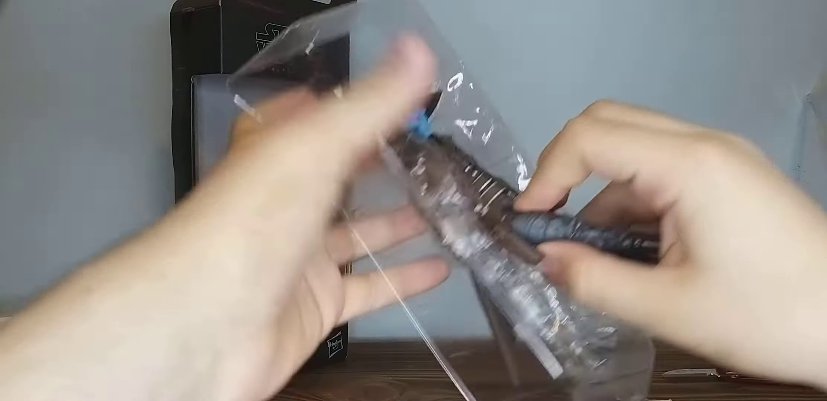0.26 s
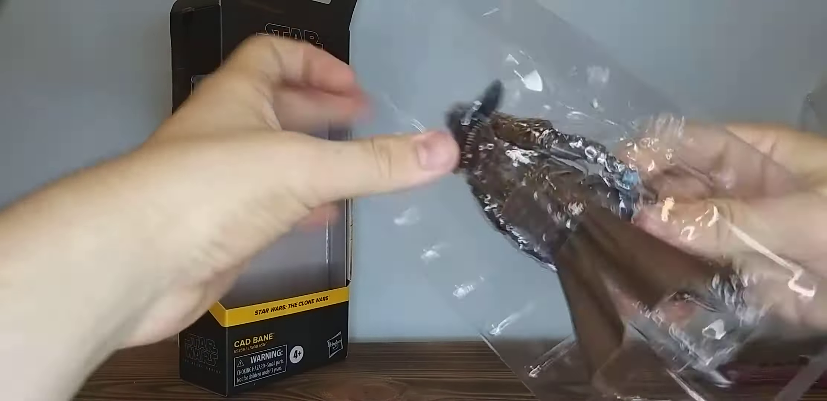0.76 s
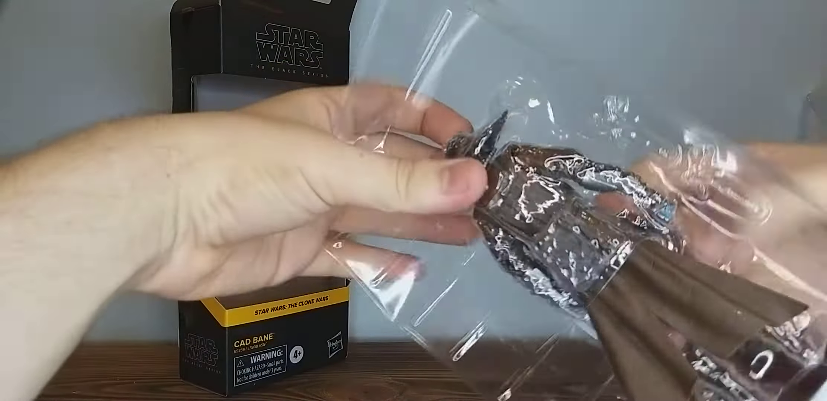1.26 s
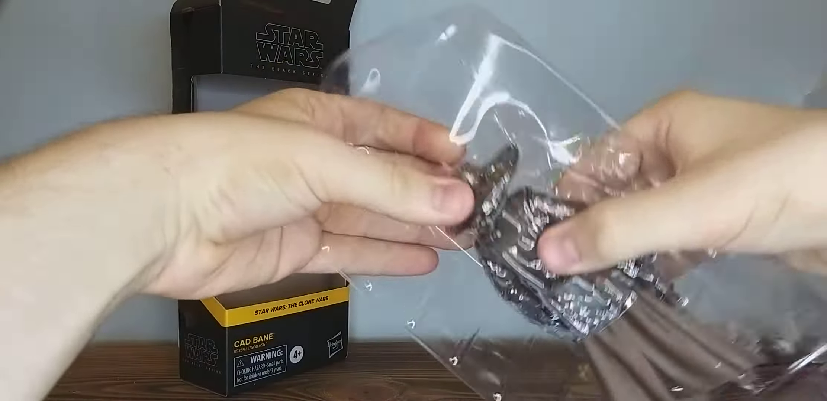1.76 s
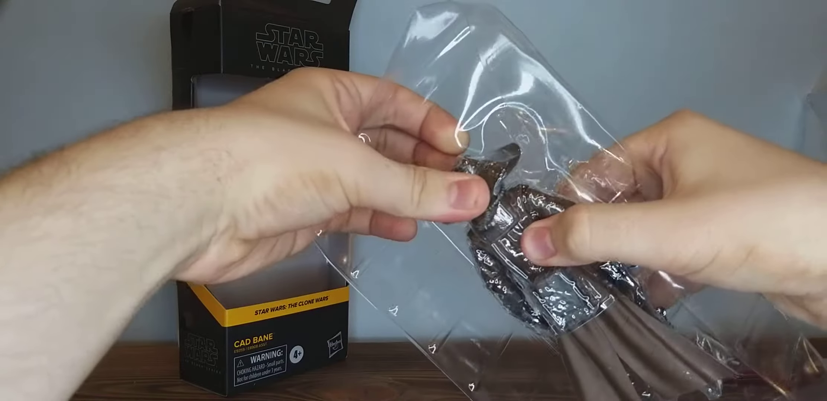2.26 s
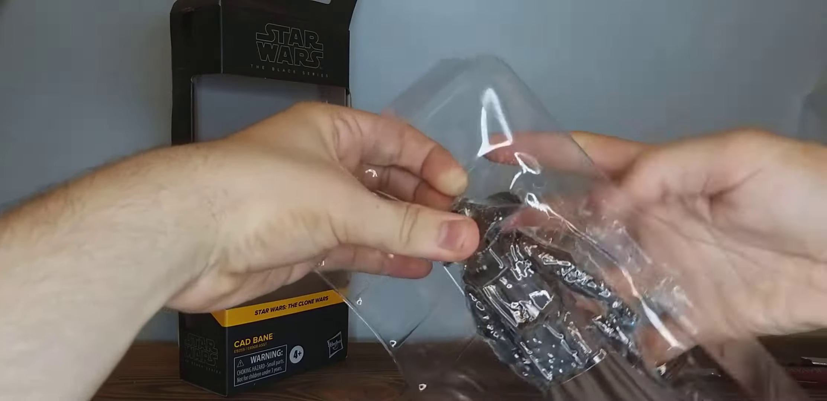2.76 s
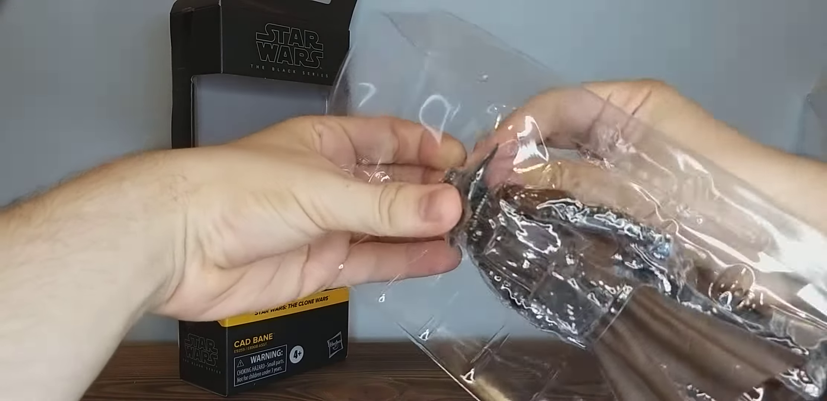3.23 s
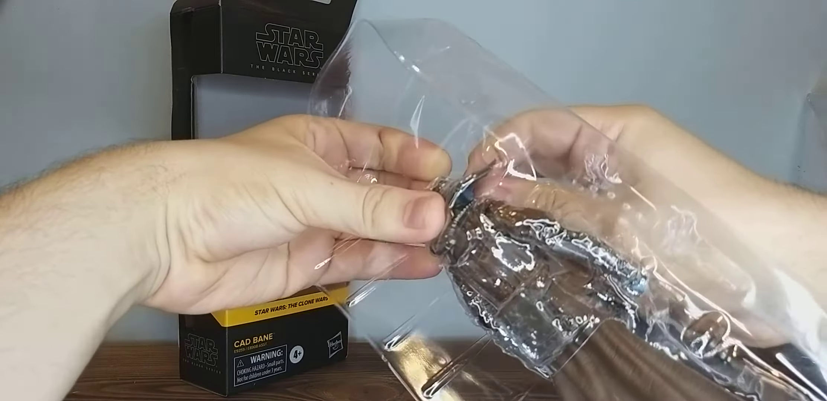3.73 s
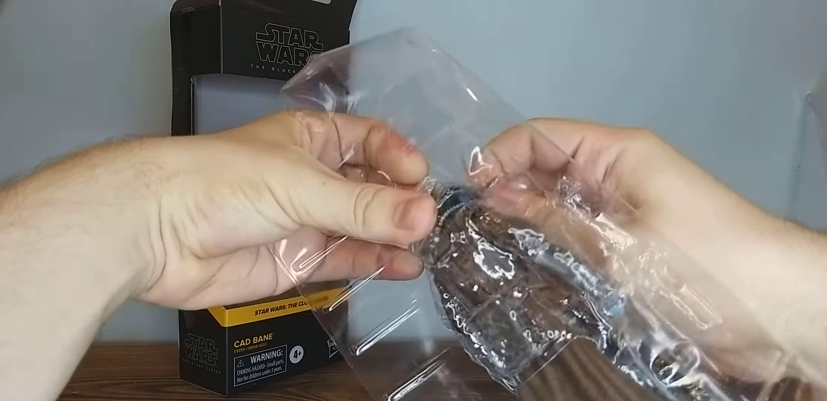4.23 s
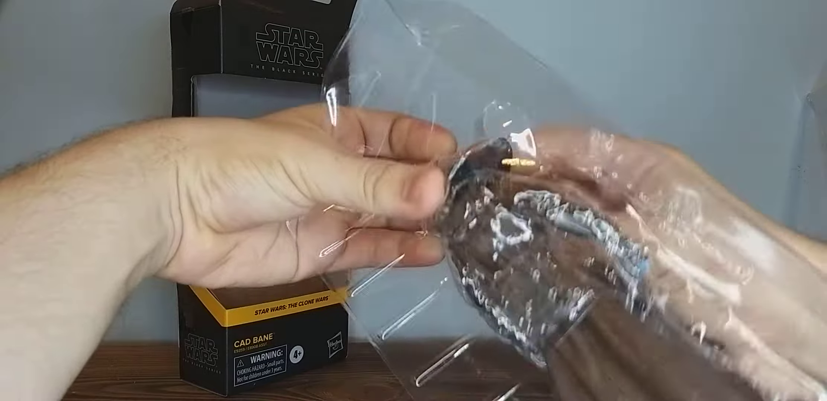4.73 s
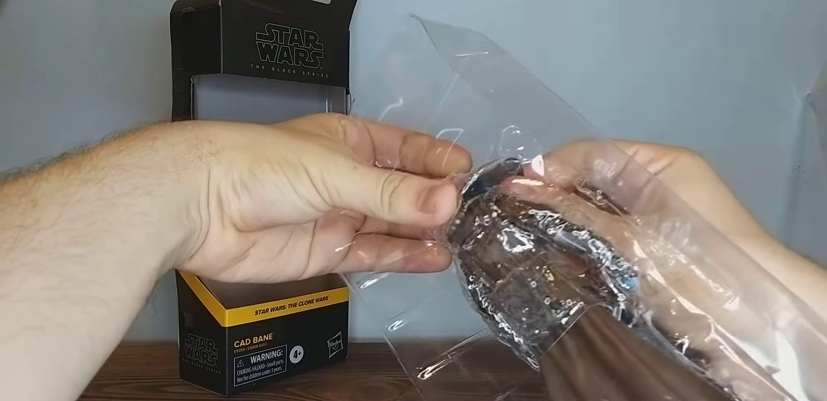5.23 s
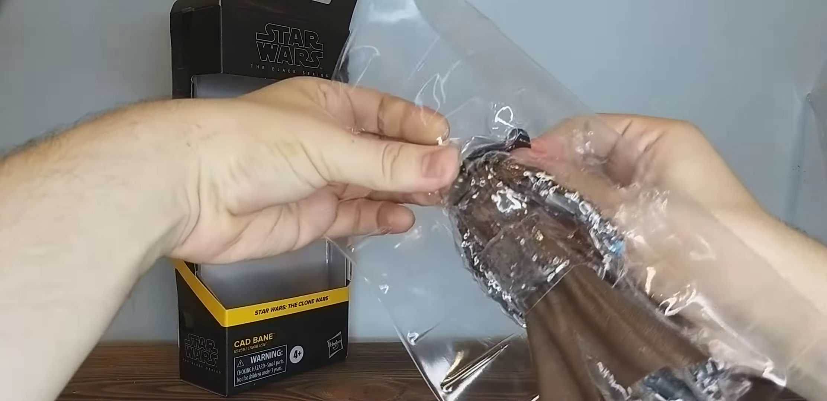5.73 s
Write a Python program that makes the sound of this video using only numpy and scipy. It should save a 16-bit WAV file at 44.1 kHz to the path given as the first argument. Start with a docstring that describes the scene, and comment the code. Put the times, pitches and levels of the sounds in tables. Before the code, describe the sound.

Close to a stereo microphone, hands squeeze and flex thin plastic packaging, which crackles in uneven bursts from start to finish. Single creases give way with crisp clicks, wider panels flip with dull pops, and edges tick as they slip. Each squeeze brings a quick swell of crinkling and low rustle, with short lulls between. The small room adds a short tail and a very faint hiss.

```python
"""A thin moulded plastic tray, bent in two hands close to a stereo camera microphone in a small quiet room.
Creases snap one by one: each clicks at its own pitch, rings the tray and fizzes in the treble.
Wide panels flip with dull pops, edges slip past pocket walls and fingertips tick on the plastic.
A carpet of small crackles and the low rustle of the flexing sheet follow the grip.
Behind them lie a short room tail and a faint hiss."""
import sys
import numpy as np
from scipy import signal
from scipy.fft import rfft, irfft
from scipy.io import wavfile
from scipy.ndimage import uniform_filter1d

SR = 44100
rng = np.random.default_rng(int(sys.argv[2]) if len(sys.argv) > 2 else 0)


def int16_out(signal):
    """Quantize to a 16-bit WAV file."""
    q = np.round(np.clip(np.atleast_2d(signal).T, -1, 1) * 32767)
    wavfile.write(sys.argv[1], SR, q.astype(np.int16))


N = 264447
EVENT_SAMPLES = 1024
HZ = np.fft.rfftfreq(EVENT_SAMPLES, 1 / SR)


def gain_of(db):
    return 10 ** (np.asarray(db) / 20)


def curve_at(points, hz):
    """Reads (frequency, value) points along a logarithmic frequency axis."""
    f, value = np.transpose(points)
    return np.interp(np.log(hz + 1), np.log(f + 1), value)


def resonance(hz, width):
    """Causal response of one resonance, gain 1 at its centre."""
    return 1j * HZ * width / (hz ** 2 - HZ ** 2 + 1j * HZ * width)


def stereo_pair(a, b, hz, lag_s=0):
    """Left and right spectra at the microphone from two unrelated ones, by likeness, balance and lag."""
    # how alike the two capsules hear: (frequency [Hz], likeness [0..1])
    likeness = [(60, 0.8), (380, 0.99), (1500, 0.3), (6000, 0.41)]
    # balance of the pair: (frequency [Hz], left minus right [dB])
    balance = [(60, 1), (400, -0.15), (950, 1.25), (3800, 1.5), (7500, 2), (15000, -0.5)]
    alike = np.clip(curve_at(likeness, hz), 0, 1)
    lean = gain_of(curve_at(balance, hz) / 2) * np.exp(1j * np.pi * hz * lag_s)
    common, apart = np.sqrt(1 + alike) * a, np.sqrt(1 - alike) * b
    return np.array([(common + apart) * lean, (common - apart) / lean])


def burst(parts, rise_s, t60_s, uneven_db, jolt):
    """A row per event: a jolt, then uneven slips faded out by 17 ms, through (dB over 5 ms, colour) parts."""
    t = np.arange(EVENT_SAMPLES * 3 // 4) / SR
    noise = rng.standard_normal((len(parts[0][0]), 3, len(t)))
    slips = gain_of(uneven_db * np.sqrt(12) * uniform_filter1d(noise[:, 2], size=12))
    envelope = slips * (1 - np.exp(-t / rise_s)) * gain_of(-60 * t / t60_s) * np.cos(np.pi / 2 * t / t[-1])
    jump = -jolt * np.exp(-((t - rise_s) / (0.18 * rise_s)) ** 2)  # the wall jumps the same way every time
    lag_s = .00006 * noise[:, 2, :1]  # each event sits at its own place on the tray
    drive = stereo_pair(rfft(noise[:, 0] * envelope + jump, EVENT_SAMPLES),
                        rfft(noise[:, 1] * envelope, EVENT_SAMPLES), HZ, lag_s)
    power = (abs(drive) ** 2).mean(0)
    response = 0
    for db, colour in parts:
        rms = np.sqrt(2 * (power * abs(colour) ** 2).sum(1) / EVENT_SAMPLES / (SR // 200))
        response = response + colour * (gain_of(db) / rms)[:, None]
    return irfft(drive * response)


def snap(crease_db, pitch_hz, ring_db, fizz_db, jolt=2.8):
    """The crease clicks at its own pitch, the tray rings under it, the film fizzes above."""
    # ring of the whole tray: (frequency [Hz], width [Hz], relative level [dB])
    tray_modes = [(445, 276, -3.5), (1039, 172, 4.5), (1670, 900, -6)]
    # moulded pockets that colour the creases: (frequency [Hz], width [Hz], relative level [dB])
    pocket_modes = [(2754, 200, -1), (3670, 160, -24.5)]
    pitch_hz = pitch_hz[:, None]
    tone = 1 + gain_of(5.5) * resonance(pitch_hz, .2 * pitch_hz)
    click_hz = 3170 * (pitch_hz / 3170) ** 0.56  # the wide click leans toward the crease's pitch
    pockets = 1 + sum(gain_of(db) * resonance(f, width) for f, width, db in pocket_modes)
    facet_hz = click_hz * 2 ** rng.uniform(-0.97, 1.0, (len(click_hz), 3))  # small flats beside the crease
    facets = 1 + 1.5 * sum(resonance(f[:, None], .13 * f[:, None]) for f in facet_hz.T)
    # the click rolls off above about 6.6 kHz, leaving the top to the fizz
    lowpass = 1 / (1 - (HZ / 6600) ** 2 + 1j * HZ / 6600) ** 2
    crease = resonance(click_hz, 3.85 * click_hz) ** 2 * tone * pockets * facets * lowpass
    modes = sum((-1) ** k * gain_of(db) * resonance(f, width) for k, (f, width, db) in enumerate(tray_modes))
    ring = modes * resonance(1275, 3500)
    fizz = resonance(12040, 12000) ** 3
    body = burst([(crease_db, crease), (ring_db, ring)], rise_s=0.00038, t60_s=0.021, uneven_db=4.5, jolt=jolt)
    return body + burst([(fizz_db, fizz)], rise_s=0.00012, t60_s=0.012, uneven_db=3, jolt=5)


def place(times, sounds):
    """Places each stereo event at its time in seconds."""
    track = np.zeros((2, N + EVENT_SAMPLES))
    for time, sound in zip(times, sounds.swapaxes(0, 1)):
        start = max(round(time * SR), 0)
        track[:, start:start + EVENT_SAMPLES] += sound
    return track[:, :N]


def grip(t):
    """Level and dullness (dB) of the grip: squeezes bite fast and let go slowly, over a faint dull unrest."""
    # squeezes of the fingers: (start [s], hold [s], level [dB], dullness [dB])
    squeezes = [(0, .035, -54, -4.5), (0.025, .05, -46.5, 5), (0.139, 0.041, -32, 2), (0.257, 0.13, -45, 5),
                (0.448, 0.061, -43.5, 7), (0.59, .03, -50, 1.5), (0.661, 0.21, -48.5, 7.5),
                (1.053, 0.029, -49, -2), (1.126, 0.26, -52.5, 5.5), (1.472, 0.12, -46.5, 2.5),
                (1.669, 0.061, -41, 2), (1.803, 0.14, -48.5, 3), (2.032, .2, -40.5, -3.5),
                (2.3, 0.04, -36, -7), (2.424, .18, -45.5, 1.5), (2.661, 0.11, -54, -5.5),
                (2.838, .2, -49.5, -2), (3.144, 0.027, -52.5, -6), (3.317, 0.019, -58.5, -7),
                (3.448, 0.048, -65.5, 12), (3.571, 0.3, -57.5, 0), (3.799, 0.039, -44, 2),
                (3.95, 0.16, -51.5, -0.5), (4.169, 0.042, -52.5, 0.5), (4.211, 0.036, -44.5, -1.5),
                (4.323, .17, -49.5, 4), (4.55, 0.17, -37.5, 0.5), (4.903, 0.13, -54.5, -0.5),
                (5.035, 0.24, -48.5, 2.5), (5.346, 0.16, -58.5, -3.5), (5.453, 0.13, -41.5, 1),
                (5.587, 0.072, -42.5, 3), (5.758, 0.22, -52, 1.5)]
    bite_s, let_go_db_per_s, rest_db, rest_dull_db = 0.011, 263, -66.5, 2
    start, hold, db, dull_db = np.transpose(squeezes)[:, :, None]
    bite = np.clip((t - start) / bite_s, 0, 1)
    squeeze_power = (bite * gain_of(db - let_go_db_per_s * np.maximum(t - start - hold, 0))) ** 2
    rest_power = gain_of(rest_db) ** 2
    power = squeeze_power.sum(0) + rest_power
    dullness = ((squeeze_power * dull_db).sum(0) + rest_power * rest_dull_db) / power
    return 10 * np.log10(power), dullness


def small_room(sound):
    """The room behind the tray: sparse reflections of random sign, each band dying at its own speed."""
    # decay of the room: (frequency [Hz], time to fall 60 dB [s])
    decay_times = [(200, 0.4), (1000, 0.36), (4000, 0.26), (12000, 0.43)]
    length = SR // 2
    reflections = np.zeros((2, length))
    arrivals = np.arange(200, length - 20, 20) + rng.integers(0, 20, (2, (length - 201) // 20))
    np.put_along_axis(reflections, arrivals, rng.choice([-1., 1.], arrivals.shape), 1)
    hz, t, spectra = signal.stft(reflections, SR, nperseg=256)
    spectra = stereo_pair(spectra[0], spectra[1], hz[:, None])
    spectra = spectra / (1 + (hz[:, None] / 14000) ** 2)  # soft furnishings swallow the treble
    decay = gain_of(-60 * t / curve_at(decay_times, hz)[:, None])
    tail = signal.istft(spectra * decay, SR, nperseg=256)[1]
    return signal.fftconvolve(sound, tail / np.linalg.norm(tail[0]), axes=1)[:, :N]


def flexing_sheet():
    """The whole sheet wobbles in the hands: a lumpy low rustle that swells less than the crackle."""
    # spectrum of the wobble: (frequency [Hz], relative density [dB])
    spectrum = [(25, -38), (70, -15.5), (135, -10.5), (245, -6.5), (460, -2.5), (690, -7.5), (1000, -43)]
    hz, t = np.fft.rfftfreq(1024, 1 / SR), np.arange(N) / SR
    a, b, c, d = rng.standard_normal((N // 128 + 5, len(hz), 4)).T
    colour = gain_of(curve_at(spectrum, hz) - 40 * (hz > 1500))
    spectra = stereo_pair(a + 1j * b, c + 1j * d, hz[:, None]) * colour[:, None]
    rustle = signal.istft(spectra, nperseg=1024, noverlap=896)[1][:, :N]
    lump_heights = np.clip(rng.standard_normal(N // 600 + 2), -3, 1)
    lumps = np.interp(np.arange(N), np.arange(0, N + 600, 600), lump_heights)
    grip_db, dull_db = grip(t[::128])
    level_db = np.interp(t, t[::128], 0.67 * grip_db + 1.2 * dull_db - 20.5)
    return rustle / rustle.std() * gain_of(level_db + 6.8 * lumps)


def crackle():
    """Small creases go off at random; most are faint and dull, a few stand out."""
    clock = np.arange(0, N, 128) / SR
    crowding = np.cumsum(gain_of(.25 * grip(clock)[0]))  # harder squeezes set off more creases
    times = np.interp(rng.random(2400), crowding / crowding[-1], clock)
    faintness, pitch, ring, fizz = rng.random((len(times), 4)).T
    grip_db, dull_db = grip(times)
    level_db = grip_db - 8.0 - 4.44 * np.log(faintness + 0.015)
    pitch_hz = 1450 * 3.6 ** pitch ** 1.5 / gain_of(0.028 * dull_db)
    crease_db = level_db - 9.5 + 14.0 * pitch - 0.86 * dull_db
    ring_db = level_db - 10.5 + 20.0 * ring
    fizz_db = level_db - 34.0 + 23.9 * fizz - 0.53 * dull_db
    return place(times, snap(crease_db, pitch_hz, ring_db, fizz_db, jolt=0.93))


def ticks(rows, pitch_hz, ring_offset_db):
    """Small snaps that share one pitch and barely fizz."""
    times, db = np.transpose(rows)
    return place(times - .0004, snap(db, np.full(len(db), pitch_hz), db + ring_offset_db, fizz_db=db - 28))


def fingertip_taps():
    """The plastic gives a dull tick under a fingertip."""
    # taps on the tray: (time [s], level [dB])
    taps = [(.255, -31.5), (.322, -48), (.3291, -27.5), (.3384, -28), (.3556, -46), (.4084, -39),
            (.5129, -42.5), (1.4906, -48), (2.2749, -28.5), (2.3577, -38), (4.7379, -31), (4.7438, -37),
            (4.7586, -30), (5.0841, -36)]
    return ticks(taps, pitch_hz=1620, ring_offset_db=-13.5)


def edge_slips():
    """An edge slips past a pocket wall with a bright tick."""
    # slips of the edge: (time [s], level [dB])
    slips = [(1.5402, -47), (1.7414, -35), (2.02, -24.5), (2.036, -26), (2.0597, -32), (2.0828, -26),
             (2.0948, -25.5), (2.2428, -54), (2.7666, -29), (2.787, -31), (2.8643, -27.5), (2.8782, -31.5),
             (2.8888, -32), (2.9108, -30), (2.9877, -31), (4.3041, -38), (4.6121, -24), (4.6811, -20),
             (4.694, -45), (4.7265, -30), (5.0482, -28.5), (5.0588, -30), (5.2585, -28.5), (5.2716, -27.5),
             (5.5643, -37), (5.6883, -34)]
    return ticks(slips, pitch_hz=3030, ring_offset_db=-8.5)


def panel_pops():
    """Dull pops: a slow push rings one wide panel."""
    # wide panels that flip over: (time [s], relative level [dB], pitch [Hz])
    pops = [(0.165, -49, 420), (0.283, -30.5, 556), (0.613, -30.5, 300), (0.682, -24, 238),
            (0.756, -29.5, 324), (0.876, -25.5, 440), (1.509, -28, 468), (1.688, -28.5, 480),
            (1.715, -29, 377), (1.963, -31, 496), (2.034, -29.5, 507), (2.328, -28, 330),
            (2.582, -26.5, 570), (2.97, -26.5, 537), (3.424, -36, 506), (5.199, -33, 470)]
    times, db, hz = np.transpose(pops)
    panel = resonance(hz[:, None], 0.64 * hz[:, None]) * resonance(470, 1700) ** 2
    return place(times - .002, burst([(db + 2.5, panel)], rise_s=0.0019, t60_s=0.26, uneven_db=1.5, jolt=0))


def crease_snaps():
    """The clear snaps in the foreground: single creases give way as the tray bends."""
    # creases that snap: (time [s], crease level [dB], pitch [Hz], tray ring [dB], fizz [dB])
    snaps = [(0.053, -24.5, 1410, -47, -68), (0.072, -34, 1590, -30.5, -60),
             (0.1292, -27.5, 4300, -29.5, -52), (0.1512, -33, 5540, -56, -45),
             (0.1694, -19, 3840, -20.5, -47), (0.2824, -40, 2130, -41, -70),
             (0.4727, -50, 1660, -34, -69.5), (0.6868, -30, 5700, -31.5, -49),
             (0.7456, -17, 2160, -48, -32.5), (0.834, -20, 2740, -46, -42.5),
             (0.8738, -19, 4270, -21.5, -37), (1.0775, -43, 1660, -39.5, -58.5),
             (1.124, -24.5, 1700, -26, -43), (1.2481, -64, 1710, -29, -56), (1.2608, -37, 2400, -32.5, -48),
             (1.3289, -18.5, 3450, -29, -28.5), (1.686, -17.5, 3340, -62.5, -20.5),
             (1.7133, -29, 2360, -23, -53.0), (1.7999, -27.5, 3700, -47, -44),
             (1.8958, -59, 1405, -27.5, -50), (1.9478, -21, 3200, -30, -52),
             (2.0511, -23, 3000, -47, -65.0), (2.069, -19, 3558, -51, -27), (2.104, -11, 5800, -47, -26),
             (2.1126, -17.5, 3350, -27, -22.5), (2.1727, -17, 4700, -62, -34),
             (2.214, -27, 4570, -29.5, -55.5), (2.2239, -21, 3450, -30.5, -39),
             (2.2567, -18.5, 2555, -20, -38.5), (2.2958, -27.5, 3560, -34, -63),
             (2.3065, -35, 3560, -33, -62), (2.3177, -37, 3570, -34, -61.0),
             (2.3313, -37, 1810, -22.5, -38), (2.3402, -32, 2770, -36, -46.5),
             (2.3753, -32, 4470, -54, -31.5), (2.4371, -64, 1410, -32.5, -54),
             (2.5119, -16.5, 5630, -29.5, -28), (2.585, -27, 1800, -33, -68), (2.7218, -38, 1410, -28, -54),
             (2.752, -41, 2330, -33, -71), (2.918, -26.5, 3600, -33, -42), (2.974, -26, 2950, -31, -53),
             (3.0161, -20.0, 5540, -35, -28), (3.0649, -24, 2900, -32, -49.0),
             (3.1511, -28, 2860, -35, -38.5), (3.5645, -23.5, 3190, -29, -45),
             (3.6574, -31.5, 5350, -27.5, -43.0), (3.6654, -24.5, 3280, -30.5, -44),
             (3.6738, -27, 3640, -33, -53.0), (3.691, -27.5, 3570, -36, -50),
             (3.8255, -21.5, 4800, -34, -35.5), (3.8604, -28, 1780, -48, -68),
             (3.885, -28.5, 4900, -65.0, -35), (3.933, -22, 2550, -45, -42), (3.965, -25.5, 4840, -31, -34),
             (3.9931, -28.5, 5060, -35, -42), (4.0246, -21.5, 4760, -29.5, -37.5),
             (4.0715, -31.5, 5930, -65, -33.5), (4.226, -23.5, 1830, -34, -38),
             (4.3269, -29, 5100, -56, -47.0), (4.3374, -18.5, 3120, -23.5, -33),
             (4.3709, -28.5, 2408, -62, -49), (4.434, -25, 2840, -30, -44), (4.452, -25.5, 2300, -55, -58),
             (4.477, -29, 3940, -44, -39), (4.5683, -21.5, 4850, -50, -32.5),
             (4.593, -25.5, 2040, -39, -34), (4.6457, -11.5, 3200, -39, -34),
             (4.7078, -23.5, 2770, -29, -63.0), (4.9012, -33, 1790, -33, -63.5),
             (4.9125, -26, 5860, -33, -35), (4.942, -29, 1930, -39.5, -53), (4.9575, -30, 2000, -42, -53),
             (5.0693, -40, 1782, -36, -69), (5.1629, -22, 3180, -37, -45.5),
             (5.1861, -33, 2980, -28, -63.0), (5.2823, -21.5, 2960, -27.5, -34.5),
             (5.4143, -38.5, 1720, -28.5, -83), (5.4819, -49, 1401, -18, -56),
             (5.4889, -20.5, 1880, -26, -40), (5.5092, -16.5, 3500, -14.5, -47),
             (5.5204, -20.5, 3358, -27, -44.0), (5.5278, -16.5, 3670, -26, -28),
             (5.5715, -28, 2700, -26.5, -59.0), (5.615, -40, 1410, -23, -33.5),
             (5.639, -23.5, 2320, -32.5, -44.0), (5.7062, -30, 2300, -34.5, -65),
             (5.7642, -18.5, 5330, -27.5, -16.5), (5.7798, -27, 2130, -21.5, -43),
             (5.866, -28, 4740, -54, -34.5), (5.875, -25.5, 2218, -24.5, -51),
             (5.914, -23.5, 3470, -27.5, -66), (5.932, -45, 2100, -27, -70)]
    times, crease_db, pitch_hz, ring_db, fizz_db = np.transpose(snaps)
    return place(times - .0004, snap(crease_db, pitch_hz, ring_db, fizz_db))


def scene():
    """The tray close to the microphone, the room well below it, and a faint steady hiss."""
    tray = crease_snaps() + edge_slips() + fingertip_taps() + panel_pops() + crackle() + flexing_sheet()
    hiss = gain_of(-88) * rng.standard_normal((2, N))
    return tray + gain_of(-13.5) * small_room(tray) + hiss


def record(dry):
    """A microphone dip in the treble, a low-middle dip from a table-top reflection, then the band limit."""
    treble_dip = 1 - 0.48 * resonance(7940, 1670)
    low_middle_dip = 1 - 0.72 * resonance(674, 170)
    dips = irfft(treble_dip * low_middle_dip)[None, :512]
    coloured = signal.oaconvolve(dry, dips, axes=1)[:, :N]
    band_limit = signal.firwin(255, cutoff=16500, window=("kaiser", 9), fs=SR)
    return signal.oaconvolve(coloured, band_limit[None], "same")


dry = scene()
out = record(dry)
int16_out(out)
```